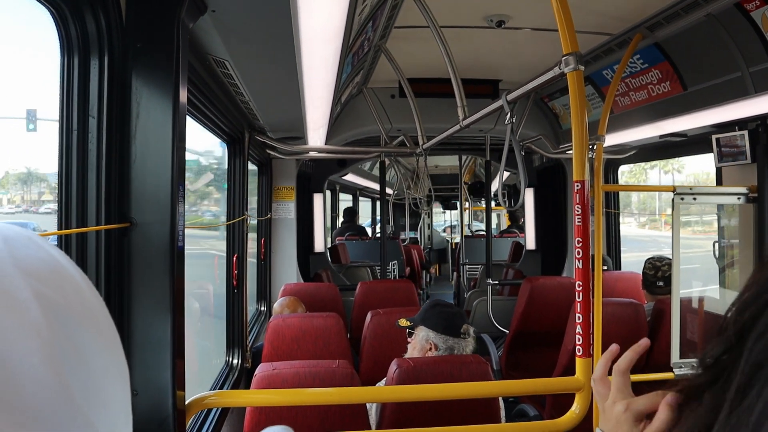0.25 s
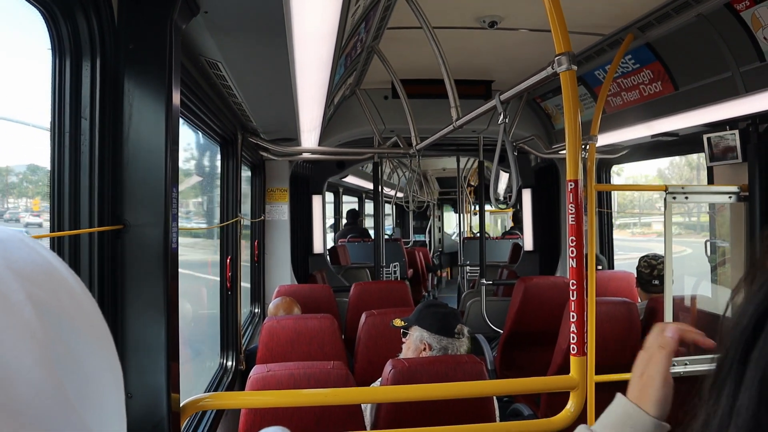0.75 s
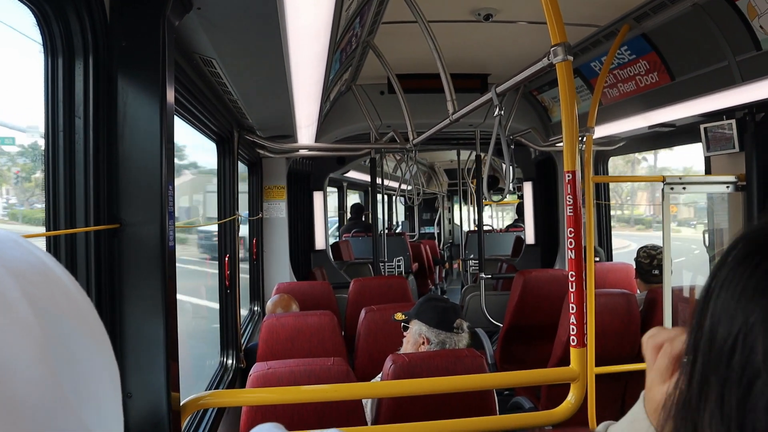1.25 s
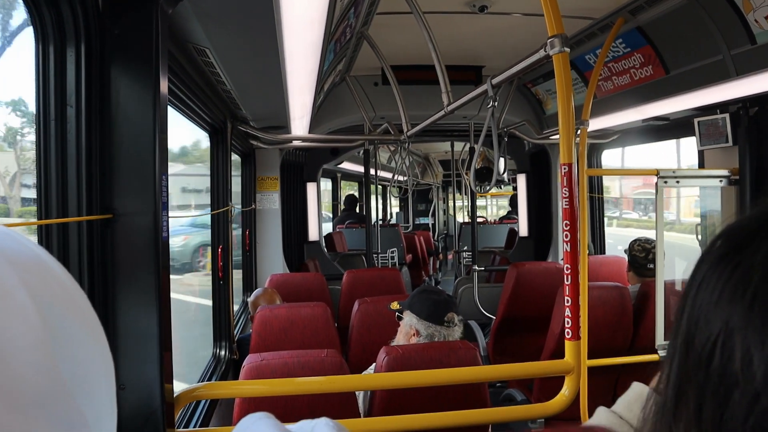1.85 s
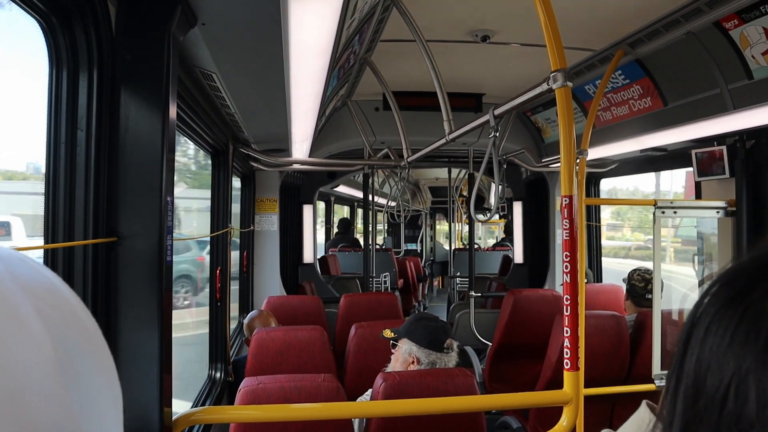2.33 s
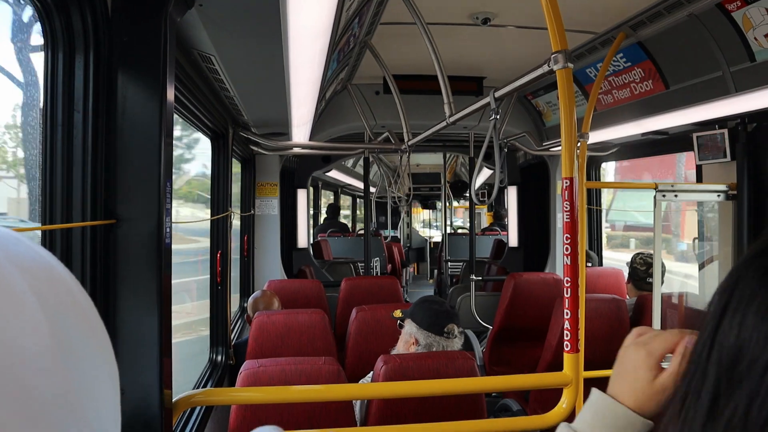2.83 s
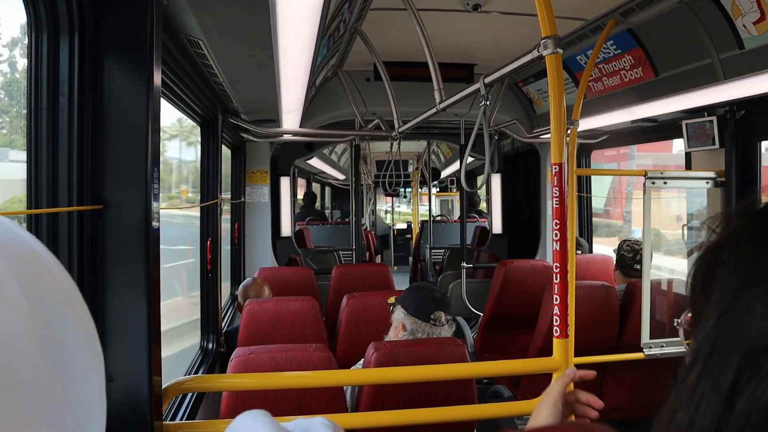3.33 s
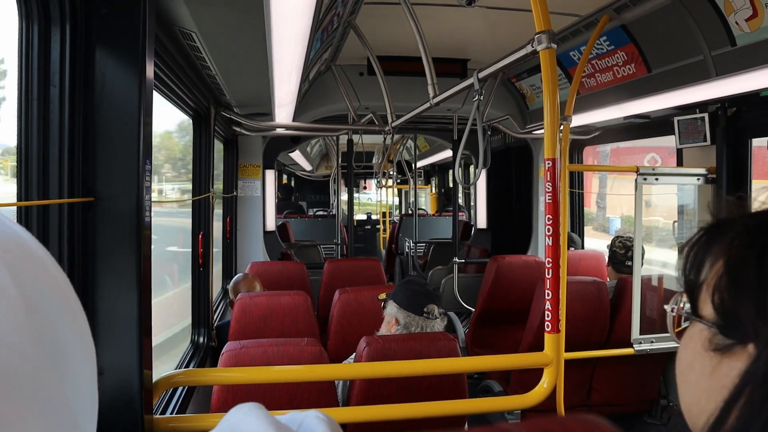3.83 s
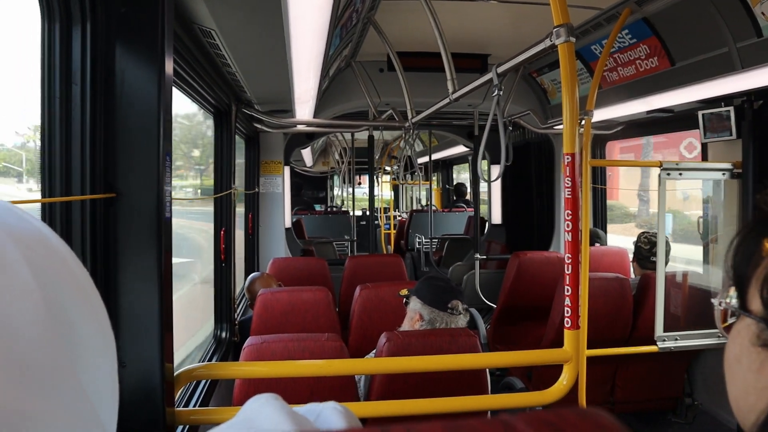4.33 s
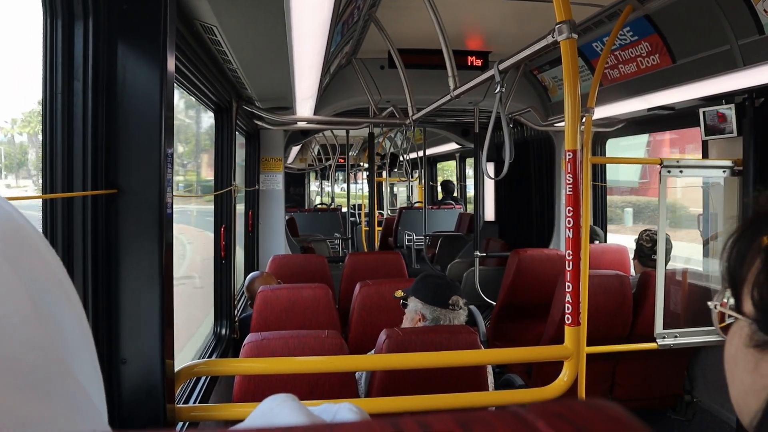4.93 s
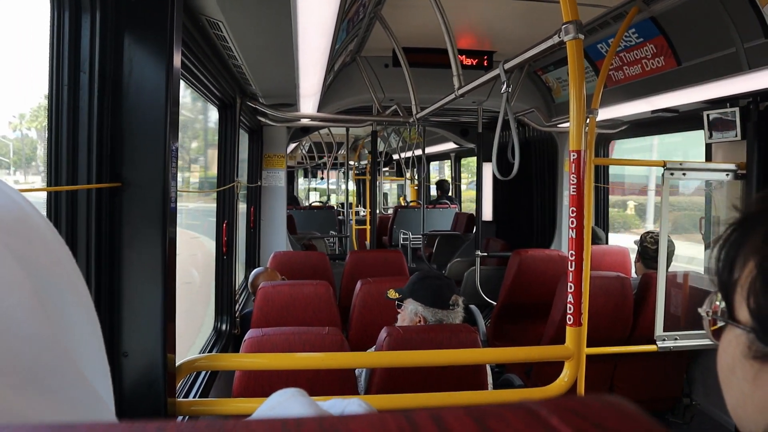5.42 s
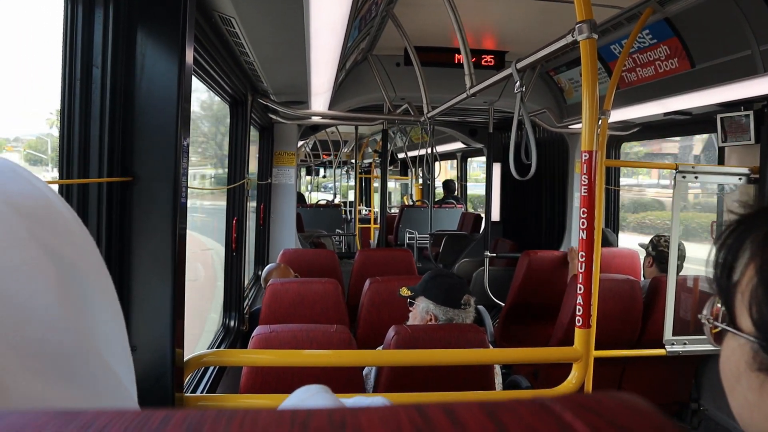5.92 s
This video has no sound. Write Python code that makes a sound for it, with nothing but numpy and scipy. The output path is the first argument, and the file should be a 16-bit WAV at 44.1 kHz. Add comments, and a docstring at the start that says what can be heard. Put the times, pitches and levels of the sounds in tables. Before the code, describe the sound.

Low bus engine hum rises in pitch, dips briefly, then rises higher, with thin gear whine, tyre roar, dull bumps and a loose fitting tinkling.

```python
"""A six-cylinder engine drones inside a city bus pulling away: it rises, sags at a gear change and rises again.
Its tones are sines locked to the crankshaft, with thin gear whines above them.
Tyres, air and panels roar as shaped noise; bumps thump in the lowest bands, with a few short soft sine pulses.
A small loose metal fitting tinkles now and then: struck resonators with a bright noisy wash.
Two close microphone ports give a widened stereo image: bass in the middle, treble in opposite phase."""
import sys
import numpy as np
from scipy import signal
from scipy.fft import rfft, irfft, next_fast_len
from scipy.io import wavfile

SR = 44100
rng = np.random.default_rng(int(sys.argv[2]) if len(sys.argv) > 2 else 0)


def dump(signal):
    """Clip the signal to [-1, 1] and save it as 16-bit WAV at the path in sys.argv[1]."""
    limited = np.clip(np.atleast_2d(signal).T, -1, 1)
    pcm = np.round(limited * 32767).astype(np.int16)
    wavfile.write(sys.argv[1], SR, pcm)


N = 272127


def amp(db):
    """Turn dB into gain."""
    return 10 ** (np.asarray(db) / 20)


def rms_one(x):
    """Scale to rms 1."""
    return x / np.sqrt(np.mean(x ** 2) + 1e-20)


def in_time(rows):
    """Draw each column of a timed table as a line, one value per sample."""
    seconds, *columns = np.transpose(rows)
    now = np.arange(N) / SR
    return np.array([np.interp(now, seconds, column) for column in columns])


def drift(rate_hz):
    """Slow random wander: coarse noise through a double one-pole low-pass, spread 1."""
    step = 40       # samples between coarse values
    settle = 2000   # coarse values dropped while the filter settles
    r = np.exp(-2 * np.pi * rate_hz * step / SR)
    noise = rng.standard_normal(N // step + settle + 2)
    slow = signal.lfilter([1], [1, -2 * r, r * r], noise)[settle:]
    return np.interp(np.arange(N) / step, np.arange(len(slow)), rms_one(slow))


# Cabin resonances and nulls in the sum of the ports: (centre [Hz], width [Hz], level [dB])
CABIN_MID = [(30, 8, -2.5), (41.8, 6.1, -6), (80, 51, 1), (109, 11, -2.5), (157, 10, -2.5), (214, 11, 2.5),
             (253.8, 20.7, -8.5), (271, 21, 3.5), (325, 107, 3), (539, 19, 3.5), (877, 9.4, 6.5),
             (942, 11, 6), (1092, 15, 5), (1230, 26, -0.5), (1350, 110, 2), (1384, 35, -5.5), (1436, 24, 3),
             (1830, 60, -1), (2040, 180, -1.5), (2800, 1200, -1.5), (4840, 720, 1.5)]
# Cabin resonances and nulls in the difference of the ports: (centre [Hz], width [Hz], level [dB])
CABIN_SIDE = [(300, 27, -5), (352, 15, -3), (466, 20, 11), (810, 25, 4), (853, 25, 6), (1070, 40, -4),
              (1150, 50, 4), (1240, 70, 3), (1620, 60, -1), (1920, 80, -4)]


def cabin_db(hz, modes):
    """Add up bell-shaped resonances: the cabin favours some pitches and swallows others."""
    return sum(level_db / (1 + (2 * (hz - centre_hz) / width_hz) ** 2) for centre_hz, width_hz, level_db in modes)


MIDDLE_RPM = 1300
# Crankshaft speed through the pull-away: (time [s], speed [rpm])
ENGINE_SPEED = [(0.0, 966), (0.3, 975.6), (1.2, 1103), (1.5, 1149), (2.15, 1247), (2.8, 1154), (3.6, 1263),
                (3.9, 1320), (4.2, 1369), (4.5, 1417), (4.8, 1472), (5.7, 1616), (5.95, 1629), (6.17, 1680)]


def crankshaft():
    """Spin the shaft: turns per second, turns so far, and hundreds of rpm above middle speed."""
    turns_per_s = in_time(ENGINE_SPEED)[0] / 60
    turns = np.cumsum(turns_per_s) / SR
    faster = (60 * turns_per_s - MIDDLE_RPM) / 100
    return turns_per_s, turns, faster


# Strong engine tones, before load and cabin:
# (vibrations per two crankshaft turns, level at middle speed [dB], growth [dB per 100 rpm])
STRONG_TONES = [(6, -23.5, -2), (7, -34, 1.5), (9, -26.5, 1), (12, -23, -2), (13, -54, -9)]
# How hard the engine pulls: (time [s], level [dB])
ENGINE_LOAD = [(0.0, -10), (0.25, -14.5), (0.45, -11.5), (0.7, -0.5), (1.5, -1.5), (2.1, -2.5),
               (2.45, -0.5), (2.85, -4.5), (3.4, 1.5), (4.4, 0), (5.4, -2), (5.9, -2.5), (6.17, 1)]
# How the cabin swells or swallows a low tone: (pitch [Hz], level [dB])
CABIN_BASS = [(48, -4), (55, -12), (59.5, 4.5), (63, -11), (66.5, 4.5), (69.5, 8.5), (73, 1.5), (76, 10),
              (79, 12), (82, 14.5), (88, 13.5), (92, 10), (96, -7), (101, 0.5), (106, -0.5), (110, 0),
              (114.5, -10.5), (119, 2), (124, 3.5), (128, 6), (134, 5.5), (141, 4), (147, 1.5), (153, -19),
              (158, -0.5), (164, 6.5), (170, -9)]


def strong_tones():
    """Main crankshaft tones, driven by engine load and shaped by the cabin bass."""
    turns_per_s, turns, faster = crankshaft()
    load_db, = in_time(ENGINE_LOAD)
    hz, response_db = np.transpose(CABIN_BASS)
    out = 0
    for half_orders, middle_db, growth_db in STRONG_TONES:
        order = half_orders / 2
        bass_db = np.interp(np.log(order * turns_per_s), np.log(hz), response_db)
        level_db = middle_db + growth_db * faster + load_db + bass_db + 0.6 * drift(2.4)
        # the phases slide, so the beats between tones are uneven
        phase = 2 * np.pi * (order * turns + rng.random()) + 0.5 * drift(0.6)
        out = out + amp(level_db) * np.sin(phase)
    return out


# Faint engine tones, before the cabin:
# (vibrations per two crankshaft turns, level at middle speed [dB], growth [dB per 100 rpm])
FAINT_TONES = [(3, -44, 2), (10, -42.5, 3.5), (11, -35.5, 0), (15, -46, 0.5), (17, -43.5, 2),
               (18, -41.5, -3), (19, -38.5, -0.5), (20, -40.5, 1.5), (21, -43.5, 0), (24, -41, -1),
               (26, -51.5, -5), (27, -49, 1), (30, -45, -1), (32, -50.5, 3.5)]


def faint_tones():
    """Weaker crankshaft tones that swell and fade as they cross the cabin resonances."""
    turns_per_s, turns, faster = crankshaft()
    out = 0
    for half_orders, middle_db, growth_db in FAINT_TONES:
        order = half_orders / 2
        level_db = middle_db + growth_db * faster
        heard_db = level_db + 1.45 * cabin_db(order * turns_per_s, CABIN_MID) + 2.0 * drift(0.8)
        out = out + amp(heard_db) * np.sin(2 * np.pi * (order * turns + rng.random()))
    return out


def engine():
    """Tones locked to the crankshaft; uneven cylinders add the half-orders."""
    return np.sqrt(2) * (strong_tones() + faint_tones())


# Gear and accessory whines, before the cabin: (vibrations per crankshaft turn, sum level [dB],
# difference level [dB], sum growth [dB per 100 rpm], difference growth [dB per 100 rpm])
WHINES = [(14.05, -56, -57, 0, -1), (17.1, -44, -54, -2, -1), (20.02, -44, -55, 1, -1.5),
          (20.95, -51, -60, -4, -2), (25.05, -48, -56, -2, -2), (30.05, -56, -59, 0, 0),
          (42.1, -54, -58, .5, .5), (50.06, -53, -55, 3, 0), (75.4, -58, -59, 0, 0),
          (85.3, -57, -54, 0, -1.5), (100.3, -62, -62, 0, 0)]


def whines():
    """Thin gear tones that follow engine speed, swell on cabin resonances and come and go; sum and difference."""
    turns_per_s, turns, faster = crankshaft()
    out = np.zeros((2, N))
    for order, mid_db, side_db, mid_growth_db, side_growth_db in WHINES:
        phase = 2 * np.pi * order * turns + 0.5 * drift(2)
        ports = [(mid_db, mid_growth_db, CABIN_MID), (side_db, side_growth_db, CABIN_SIDE)]
        for part, (level_db, growth_db, modes) in zip(out, ports):
            resonance_db = 0.5 * cabin_db(order * turns_per_s, modes)
            heard_db = level_db + growth_db * faster + resonance_db + 2.5 * drift(1.2)
            part += np.sqrt(2) * amp(heard_db) * np.sin(phase + 2 * np.pi * rng.random())
    return out


BUMP_S = 0.065   # half-length of a bump's swell
# Wheels meeting bumps: (time [s], change of the floor thump [dB], change of the cabin boom [dB])
BUMPS = [(0.03, 10, 5), (0.19, 4, -8), (0.48, 8.5, 6), (0.76, 7, -5), (1.28, 14, 3), (2.35, 6, 6.5),
         (2.85, 11, 8), (3.28, 13, -4), (3.74, 11, 0), (4.32, 16, -6), (5.36, 4, -5), (5.68, -2, 6.5),
         (6.03, 15, 10)]
# Two slow swings of the upper roar, before each region's share and centring:
# (time [s], lower part level [dB], upper part level [dB])
ROAR_SWINGS = [(0.0, -30.5, -29.5), (0.2, -33.5, -29.5), (0.45, -32, -29), (0.85, -32.5, -29.5),
               (1.05, -32, -30.5), (1.4, -32.5, -31), (2.0, -34.5, -33), (2.2, -35.5, -32),
               (2.45, -33.5, -32), (2.8, -36, -34), (3.2, -36, -34), (3.5, -35.5, -34.5), (4.1, -37, -35),
               (4.6, -36, -37.5), (4.9, -38, -36.5), (5.3, -36.5, -35.5), (5.9, -36, -34.5),
               (6.17, -37, -35.5)]
# Share of a swing taken by low panel drumming, high panel drumming, tyre roar (lower part),
# tread whirr, air rush, thin hiss (upper part): (share)
ROAR_FOLLOWS = [0.82, 0.9, 1.1, 1.21, 1.01, 0.93]
# Steady change of all eight regions as the bus gathers speed: (change [dB per s])
ROAR_GROWTH = [-0.21, -0.35, 0.12, -0.51, 0.29, 0.14, 0.14, -0.13]


def swells_db():
    """Move each roar region about its mean: bumps work the two lowest, slow swings the others."""
    bump_s, *changes_db = np.transpose(BUMPS)
    now = np.arange(N) / SR
    shapes = np.exp(-((now - bump_s[:, None]) / BUMP_S) ** 2)
    lower_db = np.array(changes_db) @ shapes
    upper_db = np.c_[ROAR_FOLLOWS] * in_time(ROAR_SWINGS)[[0, 0, 0, 1, 1, 1]]
    swells = np.r_[lower_db, upper_db] + np.outer(ROAR_GROWTH, now)
    return swells - swells.mean(axis=1, keepdims=True)


def coloured(spectrum, modes):
    """Noise with the given spectrum, heard through the cabin, rms 1, as a Fourier transform."""
    hz, level_db = np.transpose(spectrum)
    size = next_fast_len(N)
    grid_hz = np.maximum(np.arange(size // 2 + 1) * SR / size, 1)
    colour_db = np.interp(np.log(grid_hz), np.log(hz), level_db) + cabin_db(grid_hz, modes)
    shaped = rfft(rng.standard_normal(size)) * amp(colour_db)
    return grid_hz, shaped / np.sqrt(2 * np.sum(np.abs(shaped) ** 2)) * size


SURGE_SHARE = 0.85   # slow uneven surges, against the quick flicker
# Region centres, floor thump, cabin boom, then six upper regions: (centre [Hz])
ROAR_CENTRES = [30, 75, 200, 340, 560, 1100, 2400, 7000]
# Relative noise colour in the sum of the ports, before the cabin: (frequency [Hz], level [dB per Hz])
ROAR_MID = [(12, -45), (20, -7), (98, -6), (163, -10), (467, -19.5), (521, -18.5), (739, -24),
            (1110, -24.5), (1570, -29), (1850, -27), (4140, -38.5), (7100, -51), (10100, -51.5),
            (11200, -55.5), (12500, -114), (16200, -144), (22000, -120)]
# Relative noise colour in the difference of the ports, before the cabin: (frequency [Hz], level [dB per Hz])
ROAR_SIDE = [(35, -53), (60, -33), (126, -17), (290, 3), (460, -8), (580, -5.5), (640, -2.5), (850, -2),
             (1050, -2.5), (1200, -3), (1890, -1.5), (4530, -7.5), (7090, -18), (10100, -16.5),
             (12600, -30), (13300, -50), (16500, -80), (22000, -120)]


def roar(spectrum, modes, patchy_db):
    """Overlapping regions of noise, each following its own cause and flickering a little."""
    grid_hz, shaped = coloured(spectrum, modes)
    swells = swells_db()
    out = 0
    for k, swell_db in enumerate(swells):
        only_this = np.arange(len(swells)) == k
        share = np.interp(np.log(grid_hz), np.log(ROAR_CENTRES), only_this)
        region = irfft(shaped * share, 2 * len(grid_hz) - 2)[:N]
        flicker_db = patchy_db * (drift(20.0) + SURGE_SHARE * drift(2.3))
        out = out + amp(swell_db + flicker_db) * region
    return out


PULSE_S = 0.0083   # half-length; the swell also peaks this long after the table time
# Short dull low-mid pulses in the roar: (time [s], peak level of the swell [dB], pitch [Hz])
PULSES = [(2.327, -14.5, 271), (2.454, -18, 503), (2.887, -16.5, 299)]


def dull_pulses():
    """Each pulse is a few soft cycles: a sine under a bell-shaped swell."""
    now = np.arange(N) / SR
    out = 0
    for second, peak_db, hz in PULSES:
        swell = np.exp(-((now - second - PULSE_S) / PULSE_S) ** 2)
        out = out + amp(peak_db) * swell * np.sin(2 * np.pi * hz * (now - second))
    return out


WASH_CURVE = 1.54   # above 1 the wash holds at first, then stops quickly
FITTING_MIDDLE_HZ = 11000   # pivot of the brightness tilt
# Blows on the fitting, relative levels: (time [s], force of the blow [dB], wash after it [dB],
# wash t60 [s], brightness [dB per kHz])
TINKLES = [(2.5018, -47, -58, 0.056, 2), (2.5161, -48, -51, 0.18, 1), (2.6948, -44, -52, 0.081, 4),
           (3.822, -67, -60, .3, 1), (3.8782, -62, -57, .2, -1), (3.9183, -50, -54, 0.12, 0),
           (4.3993, -43, -56, 0.067, 1), (4.412, -40, -52, 0.15, 1), (4.7704, -49, -57, 0.098, 1),
           (5.1914, -43, -51, 0.17, -1), (5.5267, -45, -50, 0.093, -4.5), (5.5428, -41, -50, 0.17, 0),
           (6.0003, -51, -55, 0.19, 0), (6.1464, -51, -56, 0.12, -1)]
# Ringing modes of the fitting, pitch scattered a little per blow: (pitch [Hz], level [dB], t60 [s])
FITTING_MODES = [(8850, -14, .012), (9500, 0, .02), (9620, -1, 0.03), (10300, -1, .03), (10500, 0.5, 0.03),
                 (10800, -5, .025), (11300, -5, 0.02), (11500, 2, 0.044), (12100, -7, 0.03),
                 (12700, -10, .014), (13190, -10, .01), (13900, -15, .008)]
# A bright diffuse wash after each blow, as the cabin reverberates: (band edge [Hz])
WASH_BAND = [8900, 12400]
# Gain of the blow in the sum, then the difference of the ports: (level [dB])
BLOW_PORTS = [0, 3.5]
# Gain of the wash in the sum, then the difference of the ports: (level [dB])
WASH_PORTS = [0, 7]


def fitting():
    """Each blow cracks, strikes every mode afresh and leaves a dying wash, unlike in sum and difference."""
    since = np.arange(round(0.2 * SR)) / SR
    out = np.zeros((2, N + len(since)))
    band = signal.butter(4, WASH_BAND, "band", fs=SR, output="sos")
    uneven_db = 2.2 * np.r_[drift(60), 0 * since]   # the wash dies away unevenly
    for second, blow_db, wash_db, wash_t60, bright_db in TINKLES:
        start = round(second * SR)
        span = slice(start, start + len(since))
        dying = amp(wash_db - 60 * (since / wash_t60) ** WASH_CURVE + uneven_db[span])
        for part, blow_gain, wash_gain in zip(out, amp(BLOW_PORTS), amp(WASH_PORTS)):
            wash = wash_gain * dying * rng.standard_normal(len(since))
            crack = blow_gain * amp(blow_db + 16.0) * rng.choice([-1, 1]) * (since == 0)
            part[span] += signal.sosfilt(band, amp(11.5) * wash + crack)
            for hz, level_db, t60 in FITTING_MODES:
                r = amp(-60 / (t60 * SR))   # decay per sample
                w = 2 * np.pi * hz * rng.normal(1, 0.008) / SR
                force = amp(-28.0) * wash   # some of the same noise feeds the modes
                force[0] = blow_gain * amp(blow_db + rng.normal(0, 3.7)) * rng.choice([-1, 1])
                ring = signal.lfilter([0, np.sin(w)], [1, -2 * r * np.cos(w), r * r], force)
                part[span] += amp(level_db + bright_db * (hz - FITTING_MIDDLE_HZ) / 1000) * ring
    return out[:, :N]


MID_DB, SIDE_DB = -18.5, -28.5   # roar in the sum and in the difference of the ports


def scene():
    """Mix the sum and difference of the ports, then unfold them to left and right."""
    drone = engine()
    whine_mid, whine_side = whines()
    roar_mid = amp(MID_DB) * roar(ROAR_MID, CABIN_MID, patchy_db=0.57)
    roar_side = amp(SIDE_DB) * roar(ROAR_SIDE, CABIN_SIDE, patchy_db=0.5)
    tinkle_mid, tinkle_side = fitting()
    # close ports hear nearly the same bass: their difference fades steeply towards low notes
    high_pass = signal.butter(5, 160, "high", fs=SR, output="sos")
    drone_side = amp(-19.0) * signal.sosfilt(high_pass, drone)
    mid = drone + whine_mid + roar_mid + dull_pulses() + tinkle_mid
    side = drone_side + whine_side + roar_side + tinkle_side
    return np.array([mid + side, mid - side])


CUTOFF_HZ = 15400   # the stopband begins here


def record(dry):
    """Round the peaks smoothly, then cut the top with a steep low-pass."""
    rounded = 1.441 * np.tanh(dry / 1.525)
    low_pass = signal.cheby2(12, 70, CUTOFF_HZ, fs=SR, output="sos")
    return signal.sosfilt(low_pass, rounded)


dry = scene()
out = record(dry)
dump(out)
```